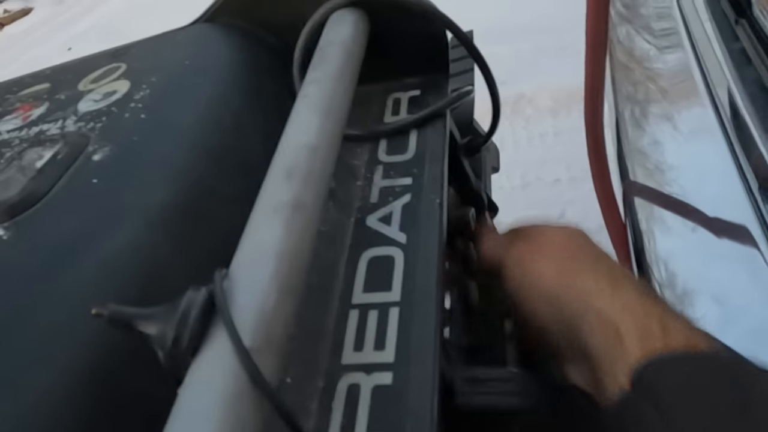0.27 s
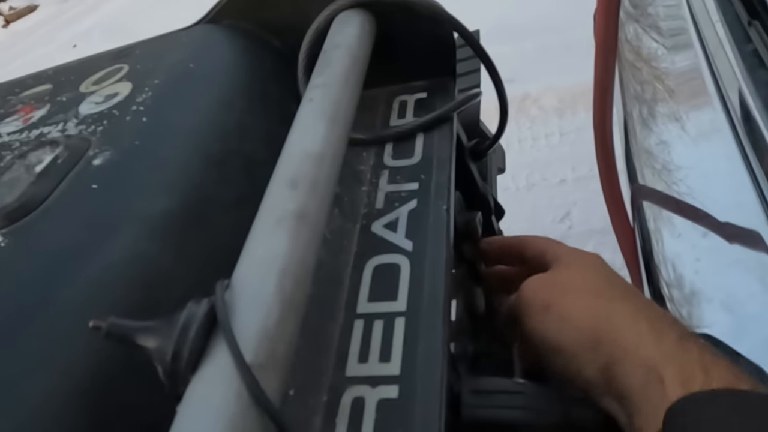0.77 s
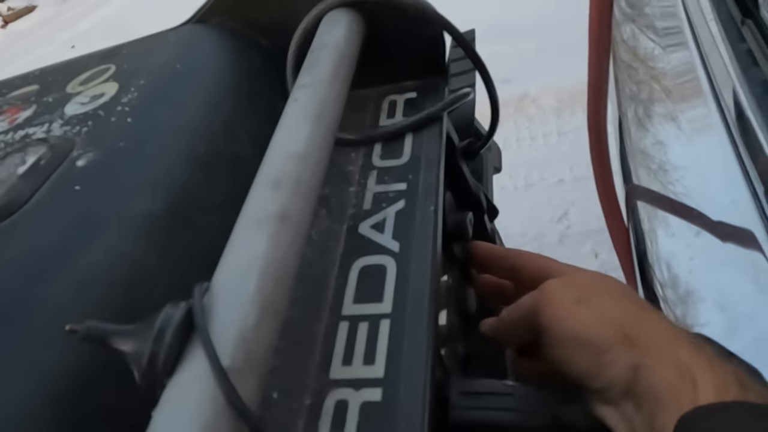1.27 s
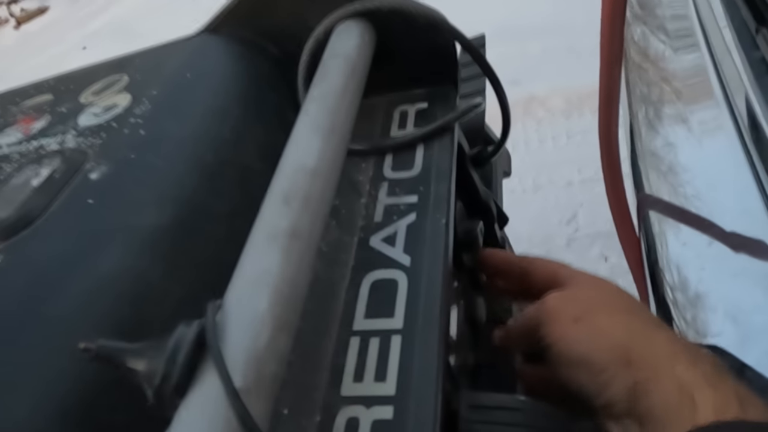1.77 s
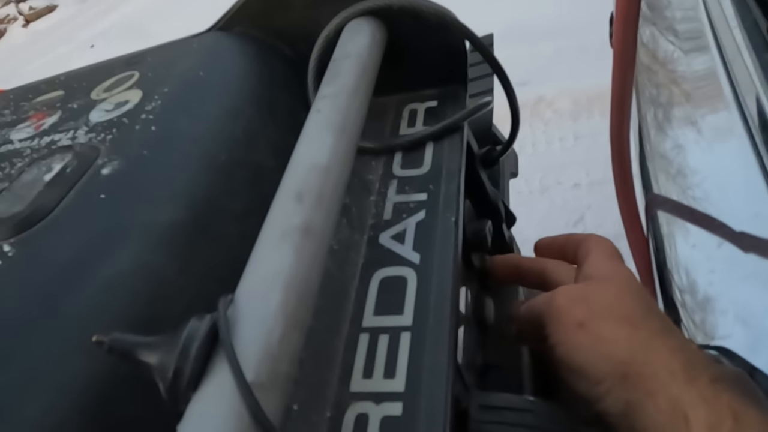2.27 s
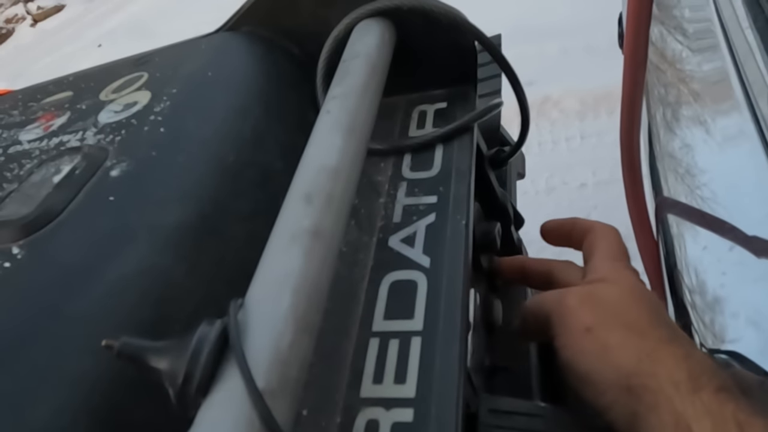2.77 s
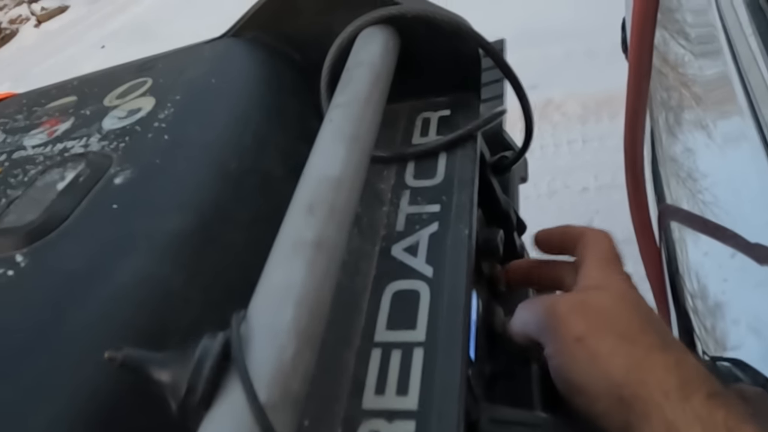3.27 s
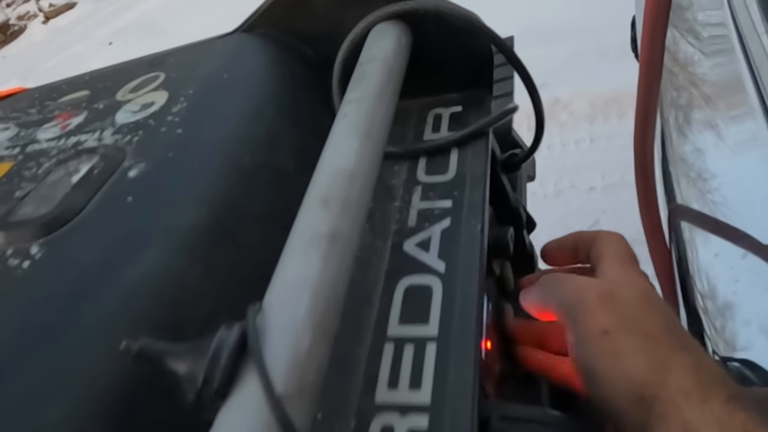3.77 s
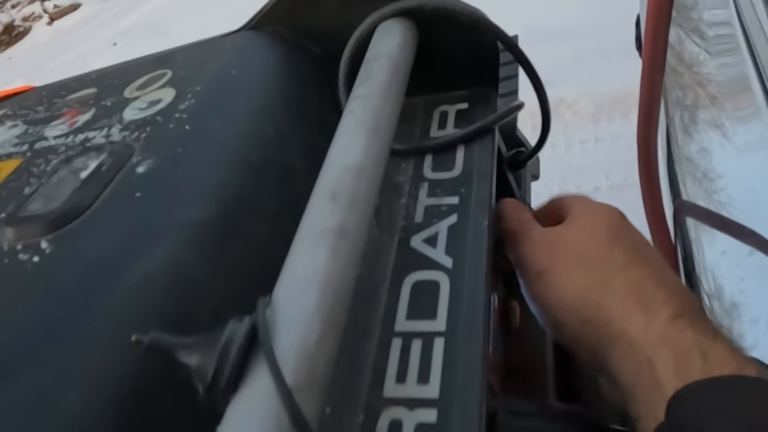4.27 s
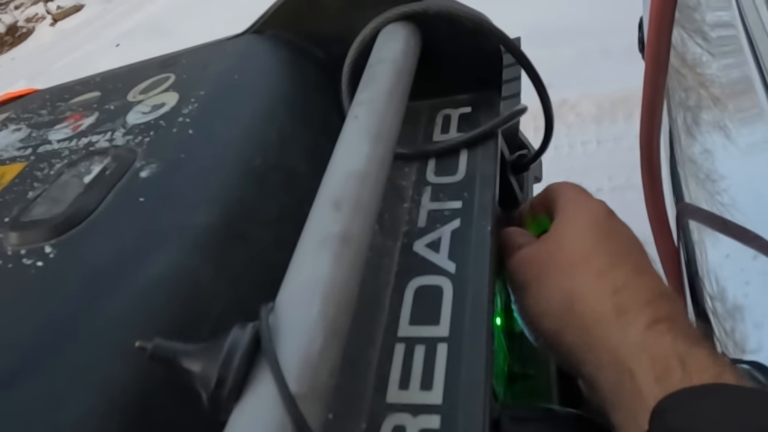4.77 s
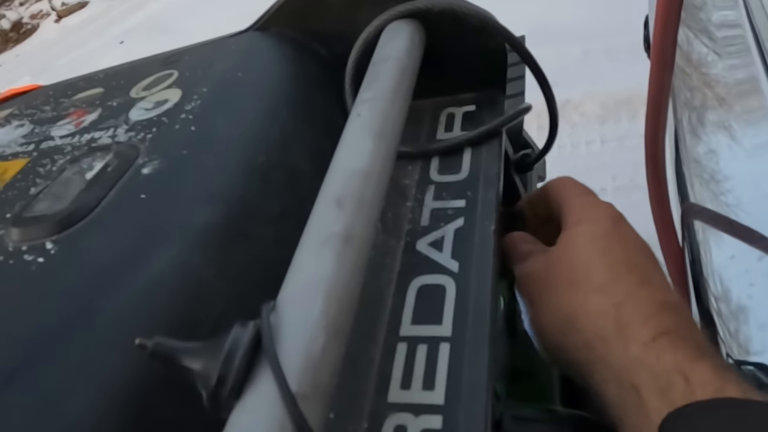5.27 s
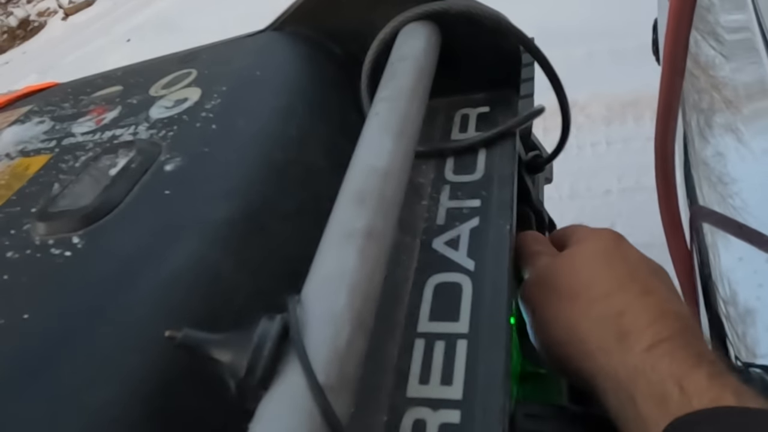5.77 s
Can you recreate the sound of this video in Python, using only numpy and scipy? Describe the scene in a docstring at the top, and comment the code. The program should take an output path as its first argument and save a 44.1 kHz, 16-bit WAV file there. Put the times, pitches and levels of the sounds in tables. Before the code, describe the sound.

Close switch clicks and gritty knocks in quiet woods, then a clanking electric starter cranks a small petrol engine until it fires and eases down.

```python
"""Outdoors in quiet woods, close to a portable petrol generator: a hand works its switches and knobs.
Fingers and sleeve are shaped noise; knocks are gritty bursts that ring panel and steel frame.
The starter grinds, whines and clanks as noise and gliding tones. The single cylinder puffs through
its muffler, fires, races and eases back; throb, pulses and valve swells follow the crank angle.
The left microphone faces the machine; the right hears it weak, late and inverted."""
import sys
import numpy as np
from scipy import signal
from scipy.fft import rfft, irfft, next_fast_len
from scipy.io import wavfile
from scipy.ndimage import uniform_filter1d, map_coordinates

SR = 44100
rng = np.random.default_rng(int(sys.argv[2]) if len(sys.argv) > 2 else 0)


def materialize(psi):
    """Save the field psi as 16-bit PCM at rate SR to the path in sys.argv[1].

    A 1-D psi becomes a single channel; in a 2-D psi each row is a channel.
    """
    bounded = np.clip(np.atleast_2d(psi).T, -1, 1)
    quanta = np.round(bounded * 32767).astype(np.int16)
    wavfile.write(sys.argv[1], SR, quanta)


N = 264864
T = np.arange(N) / SR  # s

# Resonances of the scraped panel: freq_hz, width_hz, level_db
PANEL_MODES = [(850, 60, -2), (1240, 45, 8), (1860, 60, 2), (2290, 70, -6), (2560, 40, -8), (3520, 50, -14)]
# Resonances of the steel frame: freq_hz, width_hz, level_db
FRAME_MODES = [(1000, 60, -6), (1245, 12, 1), (1416, 12, -5), (1707, 15, 4), (1955, 7, 5), (2094, 14, 2),
               (2460, 8, -2), (2573, 12, 3), (2767, 16, 3), (3526, 16, -4), (4060, 14, -3)]
CRANKING, RACING = 22, 50  # crankshaft speeds, turns per s


def amp(db):
    """Decibels to gain."""
    return 10 ** (np.asarray(db) / 20)


def unit(x):
    """Scaled to rms 1."""
    return x / np.sqrt(np.mean(x ** 2) + 1e-20)


def along(points, hz):
    """Curve through (Hz, value) points on a log frequency axis."""
    f, v = np.transpose(points)
    return np.interp(np.log(hz + 1), np.log(f + 1), v)


def gains(rows):
    """One gain curve for each dB column after the time column, silent outside the table."""
    s, *columns = np.transpose(rows)
    return [amp(np.interp(T, s, c, left=-120, right=-120)) for c in columns]


def wobble(rate):
    """A smooth random curve, rate knots a second."""
    knots = rng.standard_normal(int(N * rate / SR) + 4)
    return map_coordinates(knots, [T * rate])


def filtered(x, response):
    """x shaped by a complex response of frequency."""
    m = next_fast_len(N + SR // 2)
    return irfft(rfft(x, m) * response(np.fft.rfftfreq(m, 1 / SR)), m)[..., :N]


def modes(peaks):
    """Causal response of a set of resonances, neighbours in opposite polarity."""
    def response(f):
        total = 0
        for k, (centre, width, db) in enumerate(peaks):
            resonance = 1j * f * width / (centre * centre - f * f + 1j * f * width)
            total = total + (-1) ** k * amp(db) * resonance
        return total
    return response


def noise(spectrum, grain_db=0, rate=300):
    """White noise with a flickering level (rate knots a second), then coloured and set to rms 1."""
    grain = rng.standard_normal(N) * amp(grain_db * wobble(rate))
    return unit(filtered(grain, lambda hz: amp(along(spectrum, hz))))


def bump(angle, centre, width):
    """One smooth swell in each two-turn engine cycle; centre and width in turns."""
    return np.exp(-.5 * (((angle - centre + 1) % 2 - 1) / width) ** 2)


def hits(rows, ringing, thump_hz, grain_db):
    """Each contact is a gritty burst in four bands that also rings what it touches."""
    kick_gain = 16  # the first touch sets the resonances off at once, against the grit that follows
    low, body, edge, thump, ring = shapes = np.zeros((5, 2, N + SR))
    t, kicks = T[:SR // 3], np.zeros((2, N))
    for s, db, low_db, treble_db, thump_db, ring_db, t60, hold, right_db in rows:
        start = round(s * SR)
        decay_db = -60 * np.clip(t - hold, 0, 1) / max(t60, .003)
        fade = amp(db + decay_db) * amp([[0], [right_db]])
        band_gains = amp([low_db, 0, treble_db, thump_db, ring_db])[:, None, None]
        shapes[..., start:][..., :len(t)] += band_gains * fade
        kicks[:, start] += kick_gain * amp(ring_db) * fade[:, 0]
    grit = noise([(20, 0), (20000, 0)], grain_db=grain_db, rate=500)

    def band(shape, lo_hz, hi_hz):
        sos = signal.butter(3, [lo_hz, hi_hz], "bandpass", fs=SR, output="sos")
        level = np.sqrt(SR / 2 / (hi_hz - lo_hz))  # makes up for the narrower band
        return signal.sosfilt(sos, shape[:, :N] * grit) * level

    crack = band(low, 613, 1980) + band(body, 1870, 4330)
    fizz = band(edge, 5200, 12000)
    rung = filtered(.7 * band(ring, 700, 4380) + kicks, ringing)
    return crack + rung + fizz + band(thump, thump_hz, 374)


def woods():
    """Faint hush of the woods: steady coloured noise."""
    # Spectrum of the hush: freq_hz, level_db (per Hz)
    hush_colour = [(35, -15), (60, -4.5), (139, -14.5), (338, -27), (448, -12.5), (1110, -34),
                   (1860, -27.5), (2580, -29.5), (4750, -28.5), (16000, -40.5)]
    return amp(-66) * noise(hush_colour) * amp([[0], [8]])


def grip():
    """The hand holding the microphones: subsonic sway and low rumble under an uneven tremor."""
    # Unsteadiness of the grip: time_s, sway_db, rumble_db
    unsteadiness = [(0, -22, -39.5), (.45, -21, -32.5), (.76, -16.5, -41.5), (.86, -19.5, -27),
                    (1.1, -17.5, -35), (1.37, -16, -33), (1.66, -36.5, -31.5), (1.95, -29, -42),
                    (2.3, -31, -62.5), (2.43, -40, -22), (2.6, -25, -55), (3.0, -33, -49)]
    tremor_db, tremor_rate = 4, 11.07  # the grip is never even (dB, knots per s)
    sway, rumble = (g * amp(tremor_db * wobble(tremor_rate)) for g in gains(unsteadiness))
    swaying = sway * noise([(1, -24.5), (3, 9.5), (16, 8.5), (24, -28.5), (60, -120)])
    rumbling = rumble * noise([(10, -42.5), (22, -16.0), (65, -3.5), (95, -20.5), (150, -28.5),
                               (350, -37), (600, -120)])
    return (swaying + rumbling) * amp([[0], [6]])


def jolts():
    """The microphones are bumped: each jolt is a low sine that dies away."""
    # Bumps: start_s, pitch_hz, peak_db, t60_s, direction (signed gain), right_share (ratio)
    bumps = [(0.655, 23.9, -13.5, 0.21, 0.63, 1), (0.894, 25.6, -1.5, 0.19, -0.96, 1.5),
             (1.016, 21.6, -11, 0.4, 1, 2), (1.453, 48, -12.5, 0.13, -0.95, -4.5),
             (1.4573, 142, -7, 0.07, -1.4, 2.5), (1.494, 44, -12, .25, 1, -1.5),
             (1.561, 106, -14, 0.24, 0.52, 3), (1.78, 44.3, -9, 0.073, 0.91, 1.5)]
    t, out = T[:SR // 2], np.zeros((2, N))
    for s, hz, db, t60, way, right in bumps:
        swing = amp(db - 60 * t / t60) * np.sin(2 * np.pi * hz * t)
        out[:, round(s * SR):][:, :len(t)] += np.array([[way], [way * right]]) * swing
    return out


def rubbing():
    """Fingers scrape the resonant panel while the sleeve rustles and creaks, all as shaped noise."""
    # Fingers and sleeve: time_s, scrape_db, rustle_db, creak_db
    touch = [(0, -88, -50.5, -62), (.37, -60, -52, -55), (.63, -48, -53, -38.5), (.81, -34, -48, -35.5),
             (.91, -46, -50.5, -36), (1.05, -58, -55, -45.5), (1.14, -63.5, -67.5, -64),
             (1.3, -57.5, -94, -61), (1.52, -73.5, -44, -41), (1.62, -41.5, -44.5, -28.5),
             (1.75, -46, -52.5, -49), (1.9, -58.5, -62.5, -59.5), (2.35, -91.5, -92, -87)]
    # Spectrum of the rustling sleeve: freq_hz, level_db (per Hz)
    cloth_colour = [(290, -30.5), (500, -2.5), (795, -6), (946, -6.5), (1190, -7.5), (1340, -5), (4340, 2),
                    (4870, -5), (16000, -26)]
    # Spectrum of the creak: freq_hz, level_db (per Hz)
    creak_colour = [(60, -38), (120, -18), (170, -1.5), (230, 1), (290, -12.5), (420, -25), (800, -26),
                    (1300, -120)]
    scrape, rustle, creak = gains(touch)
    panel = noise([(300, -39.5), (700, 11.5), (1800, 3.0), (3000, 0.0), (6000, -44.0)],
                  grain_db=-1.0, rate=390)
    panel = unit(panel + amp(1.5) * filtered(panel, modes(PANEL_MODES)))
    cloth = rustle * noise(cloth_colour, grain_db=0.5, rate=130)
    creaking = creak * noise(creak_colour, grain_db=2.0, rate=34)
    return (scrape * panel + cloth + creaking) * amp([[0], [6]])


def scuffs():
    """A knob or finger is dragged: short held bursts that ring the panel and, less, the frame."""
    # Drags: start_s, peak_db, treble_db, thump_db, ring_db, t60_s, hold_s, right_lift_db
    drags = [(0.569, -43.5, -12, -8, -11, .058, 0.019, 7), (0.598, -39.5, -14.5, -16, -3, 0.038, 0.031, 6),
             (0.836, -36, -10.5, -6.5, 9.5, 0.12, 0.037, 9),
             (0.957, -28, -24.5, -25.5, 17.5, 0.16, 0.035, 7.5), (1.189, -31.5, -21, -3, -8, 0.21, 0.05, 9),
             (1.549, -26, -17.5, 1, -5, 0.071, 0.019, 0), (1.568, -29.5, -19, 8, -8, 0.12, 0.011, -2),
             (1.747, -37, -10, 15, 5.5, 0.061, 0.014, 7), (1.779, -47.5, -13, 10, -1.5, .06, 0.011, 10),
             (1.955, -38.5, -19.5, -2, -8.5, 0.042, 0.0096, 1.5)]
    low_db = -1
    rows = [(s, db, low_db, *rest) for s, db, *rest in drags]
    panel, frame = modes(PANEL_MODES), modes(FRAME_MODES)
    return hits(rows, ringing=lambda f: panel(f) + amp(-9) * frame(f), thump_hz=88, grain_db=2.0)


def switches():
    """Switches snap over: very short bursts that ring the steel frame."""
    # Clicks: start_s, peak_db, low_db, treble_db, thump_db, ring_db, right_lift_db
    clicks = [(0.229, -44, 9, -10, -14, 1, -8), (0.2436, -49.5, -12, -4, 12, -9, 2),
              (.314, -45.5, -6, -13, 2.5, -9, -10), (.926, -34.5, 3, -22, -14, -10, 18),
              (1.07, -29, 2.5, -25.5, -6.5, -14, 12), (1.115, -43, 7.5, -17, -2.5, 0, 8.5),
              (1.1917, -6, -3.5, -42.5, -15, 0, 8.5), (1.234, -24.5, -16.5, -31, -14.5, 8, -1.5),
              (1.289, -37.5, 5, -18, -0.5, 9, 10.5), (1.453, -11, -1, -16.5, 3, -10, 7),
              (1.49, -29, 4, -12, 13.5, -14, 8), (1.52, -26.5, -4, -21, -5, 13, 2.5),
              (1.662, -33.5, -11, -29, 1, -12, -0.5), (1.832, -41, 4.5, -11.5, 3, -11, 3),
              (1.896, -52.5, 6, -11, 3.5, -12, 1.5), (2.036, -61.5, 3, -19, 9, -11.5, 10.5),
              (2.1, -62.5, 8, -21.5, 13, -9.5, 3)]
    t60_s, hold_s = 0.035, 0.00037
    rows = [(*row, t60_s, hold_s, right_db) for *row, right_db in clicks]
    return hits(rows, ringing=modes(FRAME_MODES), thump_hz=52, grain_db=2.5)


def starter_gears():
    """Gear noise: grainy noise through the resonances of the starter housing."""
    # Resonances of the housing: freq_hz, width_hz, level_db
    housing = [(1797, 300, -3), (1890, 90, 0), (2240, 100, 0), (2790, 80, 4.5), (2590, 400, 0),
               (3695, 90, 4), (4600, 500, -6), (6900, 700, -17), (10000, 600, -24)]
    # Level of the gear noise: time_s, level_db
    gear_level = [(2.42, -49), (2.49, -41), (2.56, -47), (2.58, -27), (2.62, -36), (2.79, -31.5),
                  (2.86, -32.5), (2.93, -40), (3.0, -32)]
    grind = noise([(300, -30), (1000, -3), (8000, 0), (10500, 0), (12000, -14), (16000, -22)],
                  grain_db=2.5, rate=60)
    return gains(gear_level)[0] * unit(filtered(grind, modes(housing)))


def starter_whine():
    """The meshing teeth whine: multiples of a gliding, fluttering mesh rate, dulled by the housing."""
    # Gear mesh: time_s, mesh_hz, level_db, lowest_tone_db, upper_tones_db
    glide = [(2.43, 991, -44, -6, -4), (2.465, 1154, -34, -4, -8), (2.49, 1139, -34, -6, -6),
             (2.51, 954, -38, 5.5, -1), (2.531, 900, -46, 0, -3), (2.561, 860, -52, -2, 0),
             (2.6, 797, -47, -8, 0), (2.619, 805, -40, -6, 0), (2.69, 873, -43, -7, 3),
             (2.74, 902, -37, -8, 2), (2.789, 923, -38, -6, 0), (2.825, 945, -39, -15, -6),
             (2.855, 917, -27, -18, -14), (2.872, 840, -34, -14, -10), (2.9, 763, -55, -5, 0)]
    # Upper tones: multiple (of the mesh rate), level_db
    upper_tones = [(3, -4), (4, -2), (5, -12), (6, -10), (8, -11)]
    # The housing passes little of the whine's top: freq_hz, gain_db
    housing_colour = [(500, 0), (7000, 0), (8200, -20)]
    flicker_db = 2.5  # teeth load unevenly
    s, hz, db, lowest_db, upper_db = np.transpose(glide)
    flutter_hz = 10 * noise([(5, -2.5), (60, -1.0), (120, -36.5), (300, -120)])
    mesh = 2 * np.pi * np.cumsum(np.interp(T, s, hz) + flutter_hz) / SR
    tones = [(1, np.interp(T, s, lowest_db)), (2, 0)]
    tones += [(k, level + np.interp(T, s, upper_db)) for k, level in upper_tones]
    whine = sum(amp(level + flicker_db * wobble(70)) * np.sin(k * mesh) for k, level in tones)
    whine = whine * amp(np.interp(T, s, db, left=-120, right=-120))
    return filtered(whine, lambda f: amp(along(housing_colour, f)))


def cover_pings():
    """A cover rings briefly: sines under half-sine swells."""
    # Short rings: start_s, pitch_hz, peak_db, length_s
    rings = [(2.955, 815, -25, .065), (4.95, 815, -31, .03)]
    out = np.zeros(N)
    for s, hz, db, length in rings:
        swell = np.sin(np.pi * np.clip((T - s) / length, 0, 1))
        out += amp(db) * swell * np.sin(2 * np.pi * hz * T)
    return out


def starter_clanks():
    """Pinion and flywheel clank as the pinion takes load: bursts that ring the frame."""
    # Clanks: start_s, peak_db, treble_db, thump_db, t60_s, hold_s
    clanks = [(2.356, -34.5, -21, -3, 0.061, 0.02), (2.386, -27, -17, 4.5, 0.034, 0.015),
              (2.404, -18.5, -13.5, 3.5, 0.031, 0.0029), (2.417, -44, -20, 21, 0.1, 0.016),
              (2.472, -36, -31, 6, 0.12, 0.047), (2.577, -27.5, -38, 4.5, 0.21, .0035),
              (2.877, -28, -15, 2, 0.1, 0.018), (2.905, -31.5, -6, 4, 0.019, 0.0032),
              (2.948, -22.5, -14.5, -16, 0.062, 0.008), (3.025, -22, -18, -4, 0.063, 0.0098),
              (3.118, -30.5, -8, 4.5, 0.14, 0.0036), (3.193, -30, -14, 3, .07, 0.025),
              (3.265, -34.5, -14, 7.5, 0.095, 0.028), (3.321, -36, -16, 9.5, .04, 0.033),
              (3.386, -42, -8, 13.5, .04, 0.025), (3.471, -41, -24.5, -13, 0.014, 0.002),
              (3.718, -28.5, -11, -28, 0.023, 0.0044), (4.676, -30.5, -17, -30, 0.18, 0.0023)]
    low_db, ring_db, right_db = -2.5, -8, -0.5
    rows = [(s, db, low_db, treble_db, thump_db, ring_db, *fade, right_db)
            for s, db, treble_db, thump_db, *fade in clanks]
    return hits(rows, ringing=modes(FRAME_MODES), thump_hz=165, grain_db=3.0)


def crank():
    """Crankshaft speed in turns per s, and the angle it adds up to in turns."""
    # Crankshaft: time_s, speed (turns per s)
    turning = [(2.9, 17.46), (3.1, 10.03), (3.5, 18.46), (4.2, 20.85), (4.69, 22.12), (4.73, 27.8),
               (4.766, 47.5), (4.8, 51.1), (4.9, 56.7), (5.15, 57.9), (5.23, 57.7), (5.29, 56.5),
               (5.59, 50.6), (5.93, 47.1), (6.01, 46.6)]
    rest_turn = 1.81  # angle before it moves
    speed = np.interp(T, *np.transpose(turning), left=0)
    return speed, rest_turn + np.cumsum(speed) / SR


def machinery(speed, angle):
    """Block clatter, tappet and air hiss are noise swelling with the valves, over a low drone."""
    # Level of the clatter: time_s, clatter_db
    clatter_level = [(2.35, -69), (2.41, -30.5), (2.53, -45), (2.59, -36.5), (2.76, -36), (2.84, -34),
                     (3.2, -32.5), (3.5, -33.5), (4.52, -33.5), (4.87, -31.5), (5.05, -31), (5.35, -29.5),
                     (5.58, -28), (5.7, -29), (5.82, -32), (6.01, -32)]
    # Spectra of clatter, hiss, drone and the tappet's thin ring: freq_hz, level_db (per Hz)
    block_colour = [(120, -26), (260, -8), (400, -2.5), (462, 1), (573, -4), (694, -2), (1110, -7),
                    (1970, -6.5), (2620, -6.5), (2920, -12.5), (3800, -9), (4490, -11), (5990, -26),
                    (7000, -25.5), (9100, -29.5), (15400, -120)]
    air_colour = [(2940, -17), (5000, 1.5), (6000, -2), (10200, -9.5), (11800, -16.5), (14300, -17.5),
                  (15400, -24.5), (16200, -44.5)]
    drone_colour = [(41, -21), (70, -7.5), (108, -16), (156, -8), (227, -11.5), (376, -15), (600, -27.5),
                    (780, -46.5), (1320, -120)]
    tappet_colour = [(6000, -40), (9300, -12), (10200, 0), (11000, -19), (14000, -45)]
    hiss_db, hiss_from_s = -15, 2.3  # level against the clatter
    drone_db, drone_clears_db = -1, -5  # against the clatter; it thins towards racing speed
    tappet_db, tappet_from_s, tappet_rise_s = -18, 5.68, 0.2  # ticks fade in as the engine eases back
    clatter, = gains(clatter_level)
    hiss = amp(hiss_db) * clatter * (T > hiss_from_s)
    thinning_db = np.interp(speed, [CRANKING, RACING], [0, drone_clears_db])
    drone = amp(drone_db + thinning_db) * clatter * noise(drone_colour, grain_db=1.5, rate=30)
    slow = np.interp(speed, [CRANKING, RACING], [1, .4])  # valves stand out most at cranking speed
    valves = 1 + slow * (1.1 * bump(angle, centre=.35, width=.18) + .3 * bump(angle, centre=1.7, width=.15))
    ticks = 1 + .8 * bump(angle, centre=.3, width=.22) + .4 * bump(angle, centre=1.7, width=.15)
    tappet = amp(tappet_db) * np.clip((T - tappet_from_s) / tappet_rise_s, 0, 1)
    tappet = tappet * bump(angle, centre=1.56, width=0.15) * noise(tappet_colour)
    block = unit(valves * noise(block_colour, grain_db=1.0, rate=250))
    air = unit(ticks * noise(air_colour, grain_db=2.5, rate=280))
    return clatter * (block + tappet) + hiss * air + drone


def shaft_throb(angle, throb):
    """The shaft throbs once a turn, with a weaker beat every two turns."""
    return throb * (np.cos(2 * np.pi * angle) + 0.22 * np.cos(np.pi * angle))


def intake_gulps(angle, gulp):
    """Two gulps in each cycle, pressure swells less a constant offset."""
    gulps = bump(angle, centre=0.58, width=0.16) + 1.5 * bump(angle, centre=1.6, width=0.081)
    return 3 * gulp * (gulps - .14)


def muffler_blows(angle, gulp):
    """One narrow pressure pulse a cycle, at the gulp level, rings the muffler."""
    # Resonances of the muffler: freq_hz, width_hz, level_db
    muffler = [(108.4, 12, -18), (140.3, 16.4, -2), (189, 65, -6.5), (304, 41, 4.5), (430, 53, -11)]
    cycle = np.floor(angle / 2).astype(int).clip(0)
    size = amp(1.5 * rng.standard_normal(cycle.max() + 1))[cycle]  # no two strokes are alike
    blow = gulp * size * bump(angle, centre=0.605, width=0.025)
    return 14 * filtered(blow, modes(muffler))


def firing_tones(speed, angle, firing, bark):
    """Multiples of the firing rate (half the shaft rate), coloured by the tailpipe."""
    # Tailpipe colour: freq_hz, level_db
    pipe_colour = [(60, -9.5), (100, -13), (142, -4.5), (175, -6.5), (195, -12.5), (225, -2.5), (260, -10),
                   (310, -11), (380, -19)]
    bark_hz = 193  # multiples above this carry the bark
    tones = np.zeros(N)
    for k in range(3, 14):
        hz = k * speed / 2
        level = amp(along(pipe_colour, hz) + 2.0 * wobble(4)) * np.where(hz > bark_hz, bark, 1)
        tones += level * np.cos(np.pi * k * angle + rng.uniform(0, 2 * np.pi))
    return 3.25 * firing * tones


def exhaust_puffs(angle):
    """Unfired exhaust strokes: trapped air escapes, then its echo returns from the end of the pipe."""
    first_turn, count = 10.3, 13  # one stroke every two turns
    puff_db, spread_db, catch_db = -12, 0.1, 3  # the last stroke catches and is louder
    pitch_hz, spread_hz = 222.3, 4.5
    out = np.zeros(N)
    t = T[:SR // 12] - .015  # s, before and after the peak
    starts = np.interp(first_turn + 2 * np.arange(count), angle, T)
    chance = rng.standard_normal((count, 2))
    levels = puff_db + spread_db * chance[:, 0] + catch_db * (starts == starts[-1])
    pitches = pitch_hz + spread_hz * chance[:, 1]
    swell = np.where(t < 0, np.exp(-(t / 0.0013) ** 2), amp(-60 * t / 0.086))
    for s, db, hz in zip(starts, levels, pitches):
        puff = amp(db) * swell * np.cos(2 * np.pi * hz * t)
        for late_s, share in [(.003, 0.87), (.019, 0.47)]:
            out[round((s + late_s + t[0]) * SR):][:len(t)] += share * puff
    return out


def engine():
    """A four-stroke cycle takes two turns; throb, gulps, exhaust and valve swells follow the crank,
    over clatter and drone with levels set in time."""
    # Strokes: time_s, throb_db (shaft), gulp_db (intake), firing_db, bark_db (upper multiples)
    strokes = [(2.84, -72, -70, -70, 0), (2.9, -18, -34, -35.5, -3), (3.3, -22.5, -27, -37.5, -3),
               (3.6, -21, -39, -43, 0), (4.1, -21.5, -27.5, -47, 0), (4.7, -22, -31.5, -38.5, 4),
               (4.78, -29.5, -46, -35, 2), (4.87, -24.5, -48, -36.5, 4), (4.93, -22, -36.5, -35, -2.5),
               (5.2, -19, -43, -35.5, -5), (5.3, -19, -41, -38.5, -1.5), (5.6, -21.5, -54, -41.5, 2),
               (6.01, -22.5, -50, -38, -4)]
    speed, angle = crank()
    throb, gulp, firing, bark = gains(strokes)
    exhaust = muffler_blows(angle, gulp) + firing_tones(speed, angle, firing, bark) + exhaust_puffs(angle)
    return machinery(speed, angle) + shaft_throb(angle, throb) + intake_gulps(angle, gulp) + exhaust


def ports(pair, lag_s):
    """The right microphone port hears an inverted, late, shaded copy whose phase wanders."""
    # Phase wander at the right port: freq_hz, wander_rad (rms)
    wander = [(30, 1.2), (130, 0.35), (400, 0.8), (1500, 0.8), (5000, 1.4), (15000, 2.6)]
    # Shading by the far side: freq_hz, left_over_right_db
    shade = [(25, 14), (60, 12.5), (200, 16), (600, 18), (1500, 15.5), (4500, 14), (9000, 11),
             (15000, 11.5)]
    steady_hz = 70  # the phase is steady below this
    bass = filtered(pair[1], lambda f: 1 / (1 + (f / steady_hz) ** 4))
    hz, _, z = signal.stft(pair[1] - bass, SR, nperseg=256)
    drift = uniform_filter1d(rng.standard_normal(z.shape), size=5, axis=0)  # smooth across pitch
    drift = unit(uniform_filter1d(drift, size=10, axis=1))  # and across time
    turned = z * np.exp(1j * along(wander, hz)[:, None] * drift)
    far = bass + signal.istft(turned, SR, nperseg=256)[1][:N]
    right = filtered(far, lambda f: -amp(-along(shade, f)) * np.exp(-2j * np.pi * f * lag_s))
    return np.array([pair[0], right])


def scene():
    """Woods, handling, starter and engine, heard at the two ports."""
    hand = grip() + jolts() + rubbing() + scuffs() + switches()
    starter = starter_gears() + starter_whine() + cover_pings() + starter_clanks()
    return ports(woods() + hand + starter + engine(), lag_s=0.00024)


def record(dry):
    """Gain, rounded clipping just under full scale, then the band limit."""
    top_hz = 16300
    x = amp(6.0) * dry
    x = x / (1 + np.abs(x / .96) ** 16) ** (1 / 16)
    return filtered(x, lambda hz: (hz < top_hz) * amp(-14 * np.clip((hz - 15000) / 1000, 0, 2)))


dry = scene()
out = record(dry)
materialize(out)
```